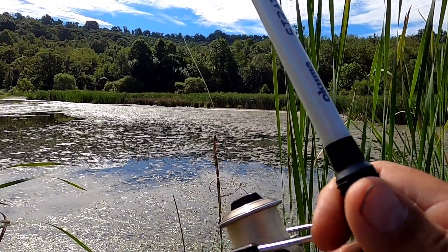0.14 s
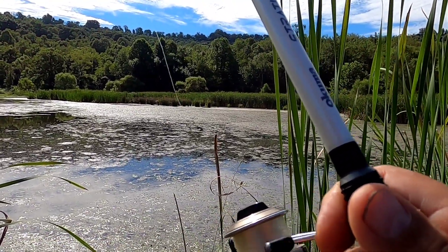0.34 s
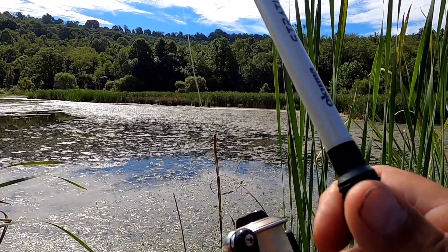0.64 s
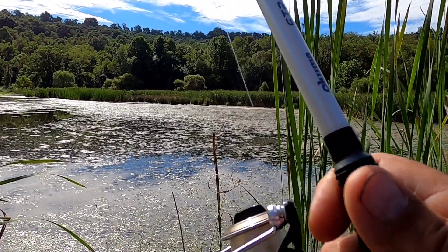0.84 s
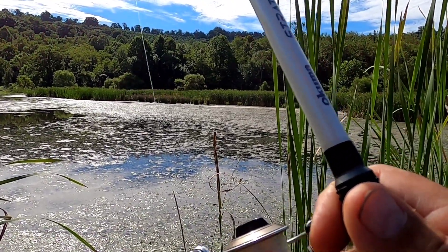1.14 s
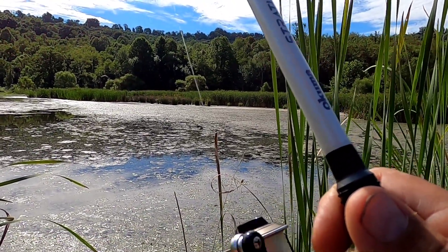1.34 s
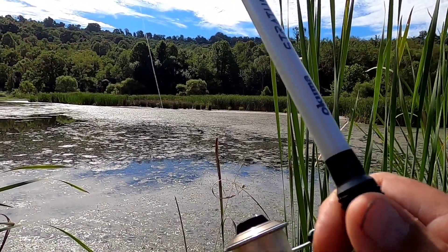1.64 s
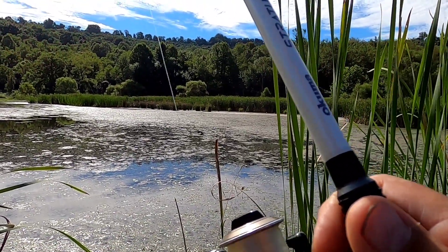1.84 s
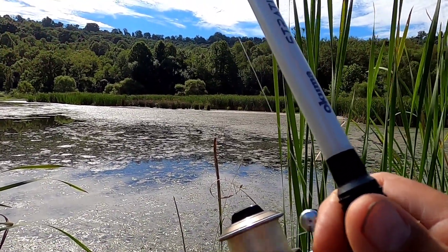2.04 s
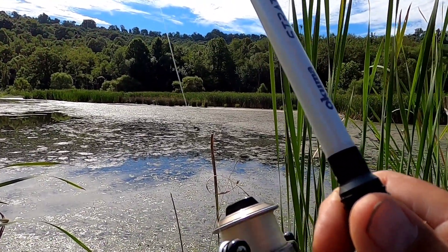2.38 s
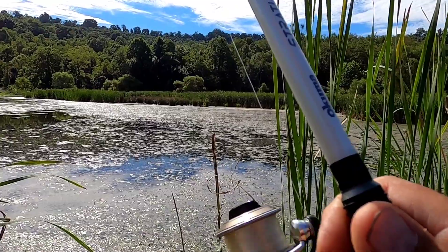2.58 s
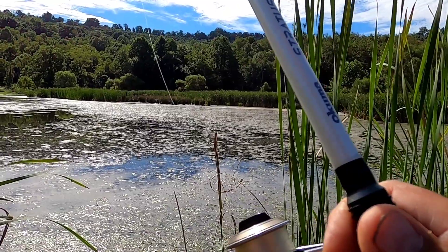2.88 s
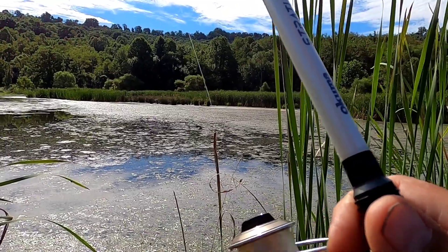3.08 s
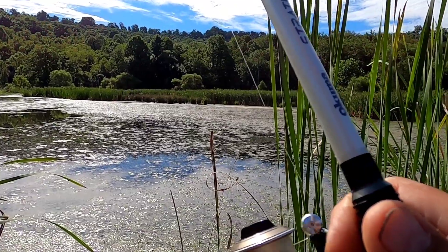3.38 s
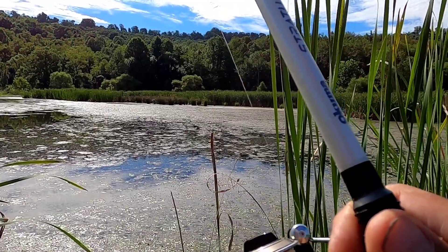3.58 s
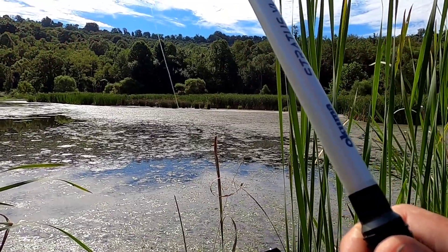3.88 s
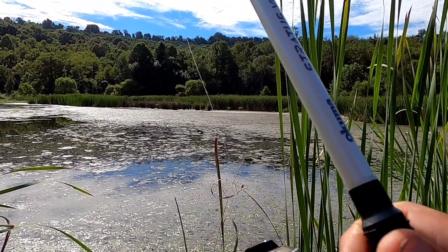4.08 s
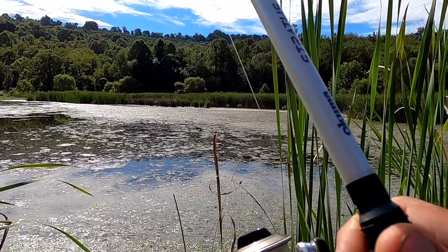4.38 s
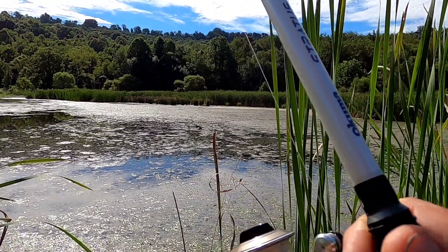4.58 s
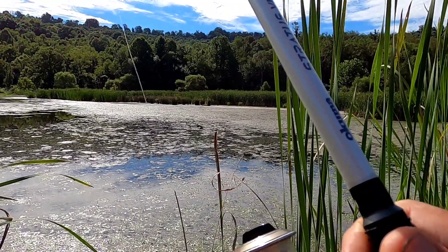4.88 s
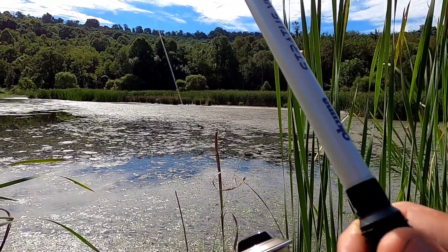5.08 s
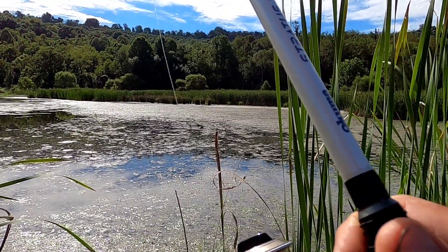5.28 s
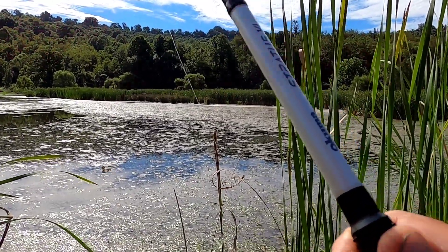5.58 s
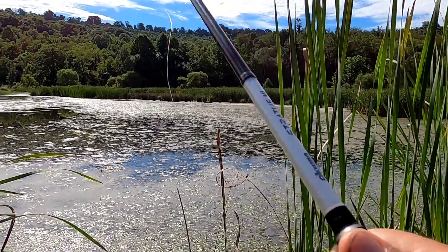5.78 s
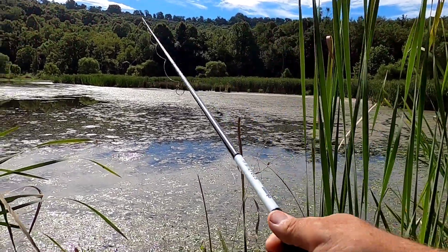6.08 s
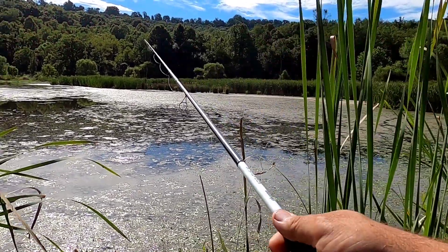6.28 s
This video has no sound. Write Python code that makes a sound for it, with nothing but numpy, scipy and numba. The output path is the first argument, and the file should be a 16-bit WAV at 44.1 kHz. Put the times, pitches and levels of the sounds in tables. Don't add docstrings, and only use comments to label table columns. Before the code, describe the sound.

Steady high insect drone and low wind rumble, with near raspy reel croaks several times a second, light clicks, and late hollow knocks.

```python
import sys
import numpy as np
from scipy import signal
from scipy.io import wavfile
from scipy.ndimage import uniform_filter1d
from numba import njit

SR = 44100
rng = np.random.default_rng(int(sys.argv[2]) if len(sys.argv) > 2 else 0)


def materialize(psi):
    bounded = np.clip(np.atleast_2d(psi).T, -1, 1)
    quanta = np.round(bounded * 32767).astype(np.int16)
    wavfile.write(sys.argv[1], SR, quanta)


def undo_db(level):
    steps = np.asarray(level, float) / 20
    return 10 ** steps


N = 283563
TIME = np.arange(N) / SR


def unit(x):
    return x / np.sqrt(np.mean(x ** 2))


def curves(table):
    s, *columns = np.transpose(table)
    return [np.interp(TIME, s, column) for column in columns]


def at(table, hz):
    table_hz, value = np.transpose(table)
    return np.interp(np.log(hz), np.log(table_hz), value)


@njit
def svf(x, g, k):
    y, b, l = np.empty(len(x)), 0., 0.
    for i in range(len(x)):
        v = (b + g[i] * (x[i] - l)) / (1 + g[i] * (g[i] + k[i]))
        b, l, y[i] = 2 * v - b, l + 2 * g[i] * v, k[i] * v
    return y


def band(x, hz, width, count=1):
    hz = np.clip(hz * np.ones(len(x)), 10, .45 * SR)
    for _ in range(count):
        x = svf(x + 1e-18, np.tan(np.pi * hz / SR), width / hz)
    return x


def noise():
    return rng.standard_normal(N)


def walk(rate):
    k = int(SR / rate)
    steps = np.repeat(rng.standard_normal(N // k + 1), k)
    return unit(uniform_filter1d(uniform_filter1d(steps, k), k)[:N])


# pitch_hz, side_minus_mid_db
SIDE_WIDTH = [(60, -11), (110, -21.5), (200, -11), (380, -8.5), (700, -10), (1290, -2.5), (2380, -6),
              (4400, -3), (8120, 10.5), (15000, -4.5)]


def wide(hz, width, count=2):
    mid, side = (unit(band(noise(), hz, width, count=count)) for _ in range(2))
    return mid + undo_db(at(SIDE_WIDTH, np.mean(hz))) * side * np.array([[1], [-1]])


def bed(spectrum, db, per_octave, swell_db, flicker_db, flicker_hz):
    out, swell = 0, swell_db * walk(0.31)
    low_hz, high_hz = spectrum[0][0], spectrum[-1][0]
    for hz in low_hz * 2 ** np.arange(0, np.log2(high_hz / low_hz), 1 / per_octave):
        level_db = at(spectrum, hz) + swell + flicker_db * walk(flicker_hz)
        gain = undo_db(level_db) * np.sqrt(hz)
        out = out + gain * wide(hz, 1.69 * hz / per_octave, count=3)
    return undo_db(db) * out / np.sqrt(np.mean(out.mean(axis=0) ** 2))


def near(x, pan_db=0.):
    shade_hz, lag_samples = 10500, 3
    left = signal.lfilter(*signal.butter(1, shade_hz, fs=SR), np.roll(x, lag_samples))
    return np.array([left * undo_db(pan_db / 2), x * undo_db(-pan_db / 2)])


def ring(s, db, hz, t60, rise=0.00013):
    t = np.clip(TIME - s, 0, None)
    envelope = (1 - np.exp(-t / rise)) * np.exp(-np.log(1000) * t / t60)
    return undo_db(db) * envelope * np.sin(2 * np.pi * hz * t)


# pitch_hz, level_db (per Hz)
AIR = [(26, -47), (45, 5.5), (54, 9), (87, -6.5), (108, -11), (174, -8), (468, -16.5), (854, -20.5),
       (1210, -22.5), (2160, -35), (4600, -53), (5980, -58), (10100, -120)]
# time_s, level_db
BREEZE = [
    (0.0, 6),
    (0.35, 0),
    (2.2, 1),
    (3.2, 0.5),
    (5.9, -0.5),
    (6.1, -1.5),
    (6.43, -2),
]


def air():
    still = bed(AIR, -54, per_octave=2.501, swell_db=0.93, flicker_db=2.0, flicker_hz=8)
    breeze_db, = curves(BREEZE)
    return still * undo_db(breeze_db)


# time_s, level_db
GUST = [
    (0.0, -51.5),
    (0.3, -56),
    (0.45, -50.5),
    (1.07, -48.5),
    (1.8, -54.5),
    (2.7, -58),
    (5.5, -57),
    (6.43, -60.5),
]


def wind():
    gust_db, = curves(GUST)
    return undo_db(gust_db + 1 + 2.42 * walk(14)) * wide(87.3, 108.6, count=3)


# time_s, level_db
ENGINE = [
    (0.0, -38),
    (1.5, -38.5),
    (3.2, -38.5),
    (3.7, -40),
    (5.4, -40.5),
    (5.68, -45.5),
    (5.8, -37),
    (6.43, -45.5),
]
# pitch_hz, width_hz, level_db
WHINE = [(177.1, 7.3, -61.5), (216.2, 3.6, -67), (496.8, 24, -78)]


def engine():
    db, = curves(ENGINE)
    firing_hz = 29 + .7 * walk(5)
    firing = np.sqrt(2) * undo_db(db + 0.39 * walk(6)) * np.sin(2 * np.pi * np.cumsum(firing_hz) / SR)
    shudder_hz = 43 + 2.52 * walk(9)
    shudder_db = -44.5 - 1.56 * TIME + 3 * walk(9)
    shudder = np.sqrt(2) * undo_db(shudder_db) * np.sin(2 * np.pi * np.cumsum(shudder_hz) / SR)
    overtones = sum(undo_db(g + 0.9 * walk(3.2)) * wide(f, w) for f, w, g in WHINE)
    rumble = undo_db(-53.5) * wide(28.3, 21.5, count=3)
    return firing + shudder + overtones + rumble


# pitch_hz, level_db (per Hz)
CHORUS = [(2470, -21), (4200, -17), (4560, -20), (4890, 0.5), (5170, -6.5), (5310, 6), (6400, 4.5),
          (7620, -13), (9380, -27.5), (13200, -57), (15500, -41)]


def chorus():
    both = bed(CHORUS, -58, per_octave=6.08, swell_db=0.6, flicker_db=1.56, flicker_hz=40.1)
    body_shade_hz = 9600
    shaded = signal.lfilter(*signal.butter(2, body_shade_hz, fs=SR), both[0])
    return np.array([shaded, both[1]])


def cricket(wing_hz, own_db, trill_hz, lag):
    rate_hz = trill_hz * (1 + .01 * walk(2) + .03 * walk(20))
    stroke = np.cumsum(rate_hz) / SR % 1
    shape = np.sin(np.pi * np.clip(stroke / .72, 0, 1)) ** 2
    tone_hz = wing_hz * (1 - .008 * (stroke - .3)) + 12 * walk(2) + 8 * walk(30)
    tone = np.sin(2 * np.pi * np.cumsum(tone_hz) / SR)
    song = unit(shape * tone) * undo_db(own_db + 1.2 * walk(16))
    echoes = .65 * undo_db(own_db) * wide(wing_hz, 55)
    return undo_db(2.0) * np.array([np.roll(song, lag), song]) + echoes


def crickets():
    trill_hz, surge_db, surge_s, surge_from_s = 36.6, 3, 1.07, 0.2
    db = -64.5 + surge_db * ((TIME - surge_from_s) / surge_s % 1)
    return cricket(5026, db, trill_hz, 2) + cricket(4897, db.mean() - 6, 1.06 * trill_hz, -2)


# time_s, slip_rate_hz, level_db
SQUEAK = [
    (6.34, 595, -95),
    (6.37, 600, -73),
    (6.41, 610, -63),
    (6.43, 634, -64),
]


def squeak():
    hz, db = curves(SQUEAK)
    turn = 2 * np.pi * np.cumsum(hz) / SR
    return near(undo_db(db) * (TIME > SQUEAK[0][0]) * (np.sin(2 * turn) + .5 * np.sin(3 * turn)))


# time_s, level_db
GRIP = [
    (5.5, -72),
    (5.672, -46),
    (5.712, -65),
    (5.88, -52),
    (5.898, -58.5),
    (5.962, -59.5),
    (6.1, -75),
]
# time_s, spread_s, level_db, pitch_hz
SCUFFS = [
    (5.659, 0.002, -41, 5100),
    (5.666, 0.0016, -37, 6170),
    (5.828, 0.0029, -49, 7350),
    (5.946, 0.0097, -55, 6960),
]


def hand():
    grip_db, = curves(GRIP)
    moving = np.interp(TIME, [5.5, 5.58, 6., 6.1], [0, 1, 1, 0])
    slide = undo_db(grip_db - 2 + 3.3 * walk(60)) * unit(band(noise(), 650, 870))
    slide += undo_db(grip_db + 1.0 + 4.1 * walk(97)) * unit(band(noise(), 2850, 2300, count=2))
    slips = 0
    for s, spread, db, hz in SCUFFS:
        slips = slips + undo_db(db) * np.exp(-.5 * ((TIME - s) / spread) ** 2) * wide(hz, 0.38 * hz)
    return near(moving * slide) + slips


# start_s, peak_db, pitch_hz, t60_s, thump_db (against peak)
KNOCKS = [(4.152, -51, 352, 0.04, -10), (5.643, -42, 910, 0.043, -18), (5.679, -19, 983, 0.027, -10.5),
          (5.729, -46, 720, 0.04, -14), (5.755, -37, 522, 0.042, -7), (5.813, -30, 514, 0.024, -25.5),
          (5.83, -37, 525, 0.034, -18), (5.85, -37, 436, 0.031, -20), (5.872, -13.5, 1010, 0.0067, -40),
          (5.919, -56, 515, 0.029, -14), (5.962, -52, 352, 0.22, -14)]


def rod():
    knocks = 0
    for s, db, hz, t60, thump_db in KNOCKS:
        knocks = knocks + ring(s, db + 2.0, hz, t60, rise=.0012)
        knocks = knocks + ring(s, db + thump_db, 271, 0.033, rise=0.0013)
    return near(knocks)


# start_s, peak_db, pitch_hz, treble_db (against peak)
TICKS = [(0.0227, -31.5, 2700, -17), (0.2865, -51, 2140, -39), (0.7585, -43, 2880, -26),
         (1.162, -43.5, 4070, -32), (2.0594, -40.5, 4450, -31), (2.391, -35, 3680, -38),
         (2.5342, -44, 2580, -41), (2.6829, -37, 2620, -14), (3.7779, -38, 4320, -14),
         (3.994, -44, 2070, -32), (4.244, -43, 2520, -27), (4.4394, -57, 4400, -18),
         (4.752, -31.5, 3740, -47), (4.9928, -34, 2720, -7.5), (5.5444, -42, 3160, -30),
         (5.6574, -39, 4570, -20), (5.6632, -30, 2080, -30), (5.679, -27, 4140, -49),
         (5.8287, -36.5, 2650, -6), (5.873, -34, 1980, -33), (5.9134, -45, 3350, -27),
         (5.92, -49.5, 4180, -25), (5.942, -30, 4050, -25), (5.9474, -39, 2450, -34),
         (5.9544, -33, 2640, -31), (6.0786, -46, 4200, -24), (6.1686, -43, 4160, -31.5),
         (6.3096, -59, 3810, -12)]


def ticks():
    out = np.zeros((2, N))
    for s, db, hz, treble_db in TICKS:
        body = ring(s, db + 1.5, hz, 0.011, 0.000095)
        crack = ring(s, db + 9, 3400, .0011, .0001) + ring(s, db + 2, 6000, .0015, .00008)
        treble = ring(s, db + treble_db + 4.5, 9700, 0.0022, .00005)
        treble += ring(s, db + treble_db + 6, 12200, 0.0016, .00005)
        out += near(body + crack, pan_db=-1.5) + near(treble, pan_db=-5)
    early = .65 * np.roll(out, int(.0013 * SR), axis=1)
    late = .3 * np.roll(out, int(.0031 * SR), axis=1)
    return out + early + late


# start_s, end_s, level_db
HAULS = [
    (-0.1, 0.01, -79.5),
    (1.2, 1.903, -80.5),
    (3.152, 3.75, -77),
    (4.3, 4.42, -81),
    (5.257, 5.91, -80),
]


def line():
    hiss = wide(12850, 6700, count=3) + 0.69 * wide(10850, 4900, count=2)
    hiss = signal.sosfilt(signal.butter(6, 13800, fs=SR, output="sos"), hiss)
    rise_db_s, fall_db_s, slack_db = 17, 48, -95
    taut_db = np.max([db - rise_db_s * np.clip(start - TIME, 0, None) - fall_db_s * np.clip(TIME - end, 0, None)
                      for start, end, db in HAULS], axis=0)
    return undo_db(np.maximum(taut_db, slack_db) + 2.0 * walk(30)) * hiss * undo_db(np.array([[-2.5], [2.5]]))


# pitch_hz, width_hz, level_db
RATTLE = [(2347, 320, -9), (2950, 980, -4.5), (3570, 440, -7.5), (4050, 850, 2), (7930, 2640, -8)]


def loose_parts():
    out = 0
    for hz, width, db in RATTLE:
        direct = .8 * near(unit(band(noise(), hz, width, count=2)))
        scattered = .6 * min(1, 3000 / hz) * wide(hz, width)
        out = out + undo_db(db + 3.4 * walk(35)) * (direct + scattered)
    return unit(out)


# share_of_resonance, width_hz, level_db
HOUSING = [(0.993, 360, 5), (1.174, 640, -7.5), (0.53, 1370, -19.5)]
# peak_s, rise_s, fall_s, level_db
CROAKS = [(0.01, 0.025, 0.066, -55), (0.21, 0.046, 0.033, -51), (0.56, 0.05, 0.12, -46.5),
          (0.93, 0.038, 0.054, -53), (1.1, 0.078, .07, -52.5), (1.285, .06, 0.048, -53.5),
          (1.478, 0.052, 0.045, -45), (1.63, 0.12, 0.043, -45.5), (1.81, 0.098, 0.062, -50),
          (2.0, 0.068, 0.11, -57.5), (2.34, 0.032, 0.14, -52.5), (2.54, 0.053, 0.034, -54.5),
          (2.71, 0.034, 0.055, -56), (2.92, 0.036, 0.064, -50), (3.111, 0.035, 0.097, -48),
          (3.25, 0.093, 0.064, -47.5), (3.47, 0.047, 0.024, -51), (3.639, 0.037, 0.061, -48),
          (3.84, 0.038, 0.038, -48), (3.999, 0.0061, 0.01, -50), (4.15, 0.019, 0.073, -42),
          (4.409, 0.02, 0.016, -59), (4.56, 0.085, 0.074, -54), (4.72, 0.04, 0.062, -46),
          (5.105, 0.032, .13, -50.5), (5.29, 0.038, 0.11, -59.5), (5.47, 0.06, 0.074, -52),
          (5.62, 0.054, 0.14, -46), (5.77, 0.058, 0.26, -49), (6.071, 0.023, .012, -56)]
# time_s, travel (0-1)
SPOOL = [(0.0, 1), (0.3, 0.7), (0.5, 0.37), (0.9, 0.07), (2.05, 0.3), (2.3, 0.72), (2.8, 0.9), (3.15, 0.25),
         (4.2, 0.15), (4.7, 0.84), (5.1, .85), (5.28, 0.34), (5.9, 0.26), (6.05, 0.63)]


def gears():
    shoulder_db, off_db = -9, -30.5
    attack_s, release_s = 0.018, 0.088
    levels = [off_db, shoulder_db, 0, shoulder_db, off_db]
    shape = np.array([np.interp(TIME - s, [-rise - attack_s, -rise, 0, fall, fall + release_s], levels)
                      for s, rise, fall, _ in CROAKS])
    top = np.array(CROAKS)[:, 3:]
    db = np.max(top + shape, axis=0)
    loaded = np.clip((db + 72) / 8, 0, 1)
    spool, = curves(SPOOL)
    rattle_db = -55 + 3.5 * spool + np.max(0.57 * (top + 50) + 1.23 * shape, axis=0)

    teeth_hz, slop, scatter_db, rub_db = 87.6, .25, 3., 1.
    chance = rng.standard_normal((900, 3))
    when = (np.cumsum(np.exp(slop * chance[:, 0]) / teeth_hz) * SR).astype(int)
    strikes = unit(np.bincount(when, np.sign(chance[:, 2]) * undo_db(scatter_db * chance[:, 1]))[:N])
    drive = strikes + undo_db(rub_db) * noise()

    hz = 1566 + 313 * spool
    wobble = 1 + .013 * walk(60)
    modes = 0
    for k, (share, width, mode_db) in enumerate(HOUSING):
        modes = modes + (-1) ** k * undo_db(mode_db) * band(drive, share * hz * wobble, width, count=4)
    croak = near(unit(modes))

    scrape = signal.oaconvolve(np.abs(strikes), np.hanning(int(0.019 * SR)), "same")
    rattle = unit(scrape + 1.03 * scrape.mean()) * loose_parts()
    croaking = loaded * (undo_db(db + 2.98 * walk(70)) * croak + undo_db(rattle_db) * rattle)

    whirr = undo_db(-69 + 0.31 * walk(5.6)) * np.clip((5.6 - TIME) / 0.029, 0, 1)
    return croaking + whirr * (0.62 * croak + rattle + 0.71 * wide(1920, 2800))


def scene():
    background = air() + wind() + engine() + chorus() + crickets()
    handling = squeak() + hand() + rod()
    reel = ticks() + line() + gears()
    return background + handling + reel


def low_pass(x):
    return signal.sosfilt(signal.butter(12, 15680, fs=SR, output="sos"), x)


def record(dry):
    return low_pass(dry)


dry = scene()
out = record(dry)
materialize(out)
```